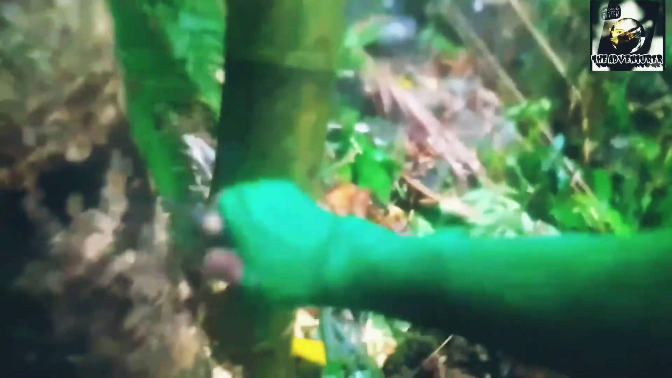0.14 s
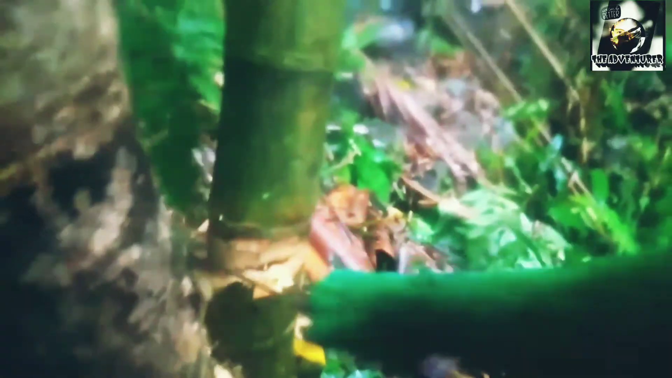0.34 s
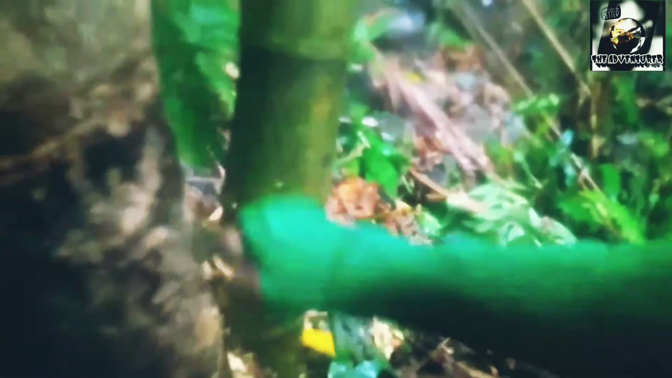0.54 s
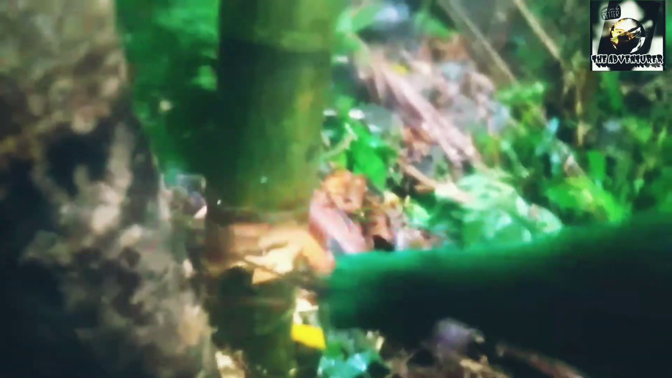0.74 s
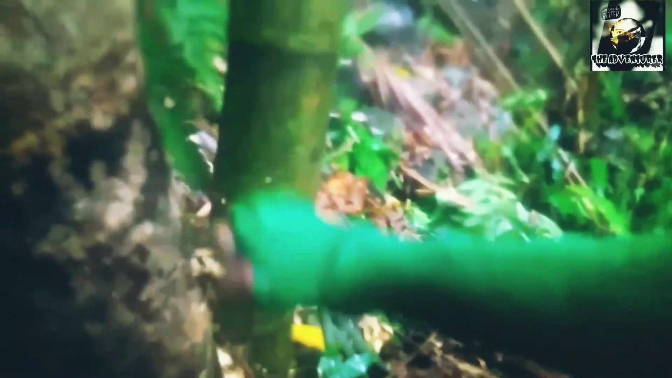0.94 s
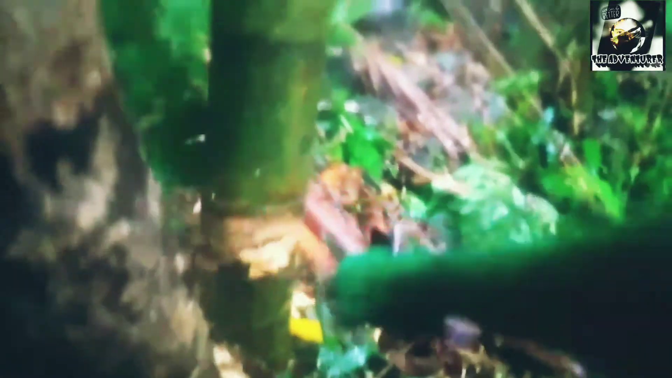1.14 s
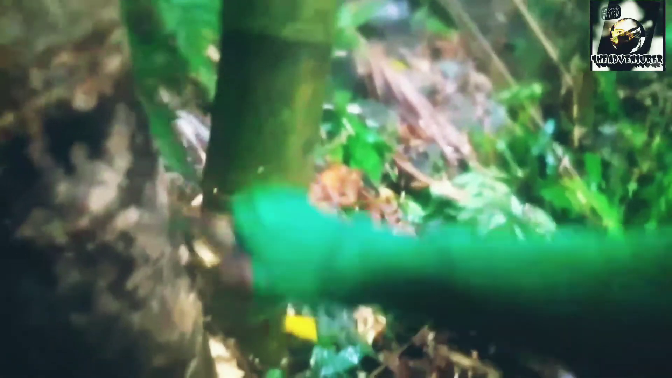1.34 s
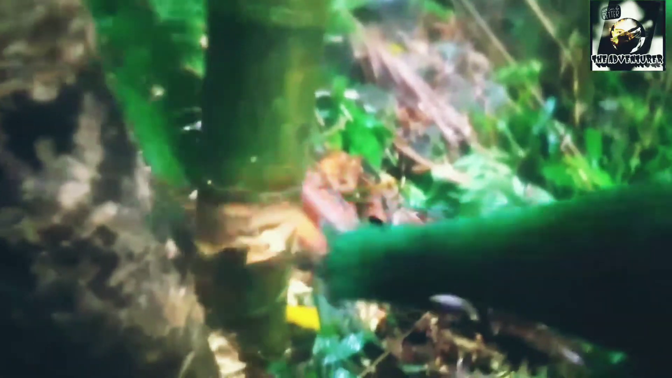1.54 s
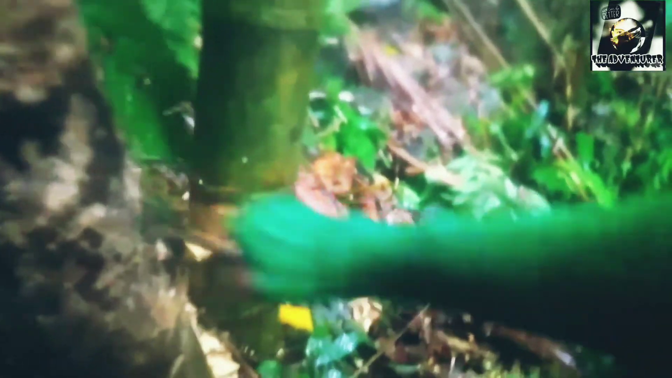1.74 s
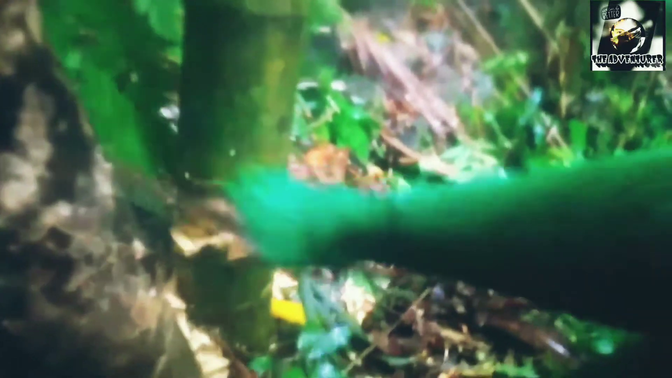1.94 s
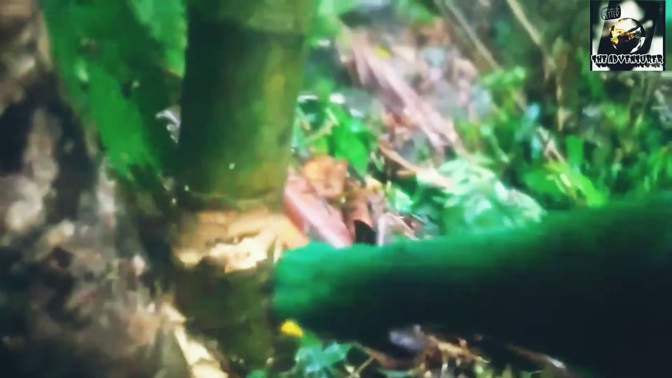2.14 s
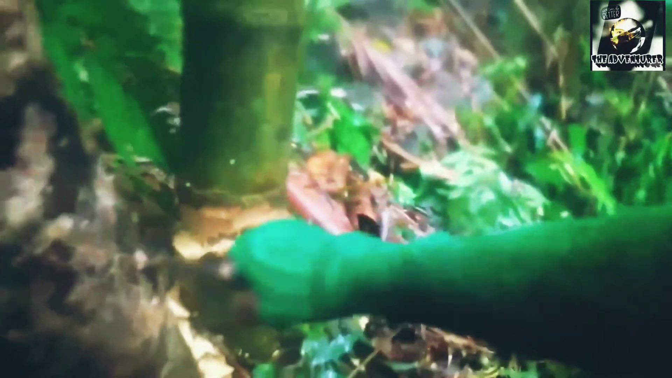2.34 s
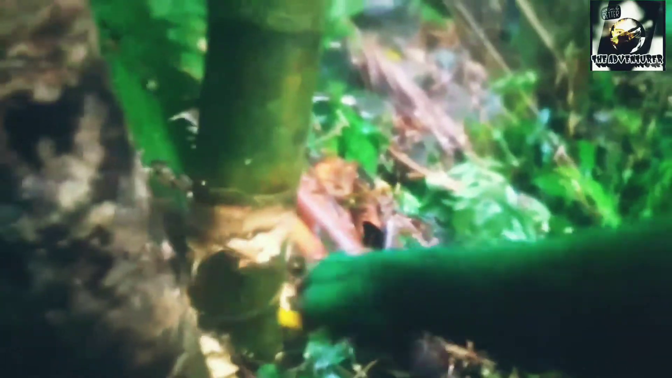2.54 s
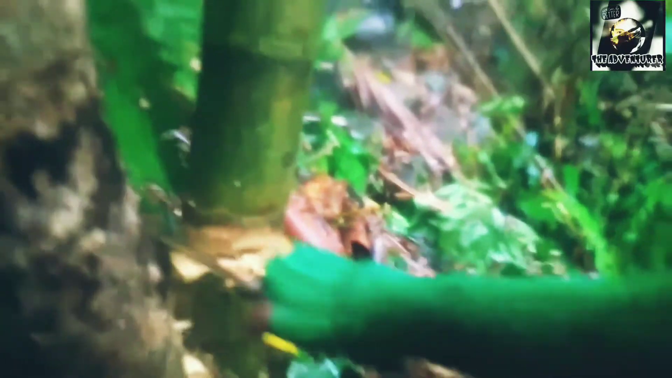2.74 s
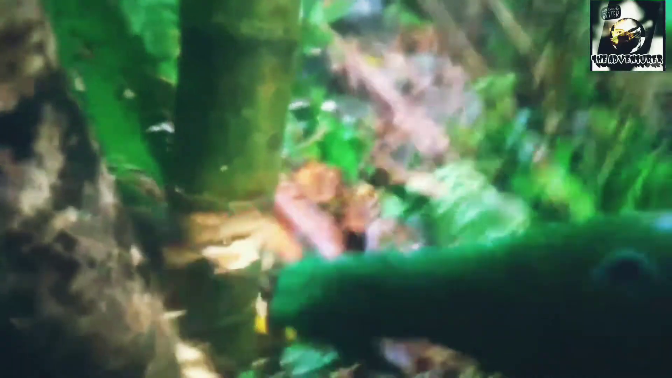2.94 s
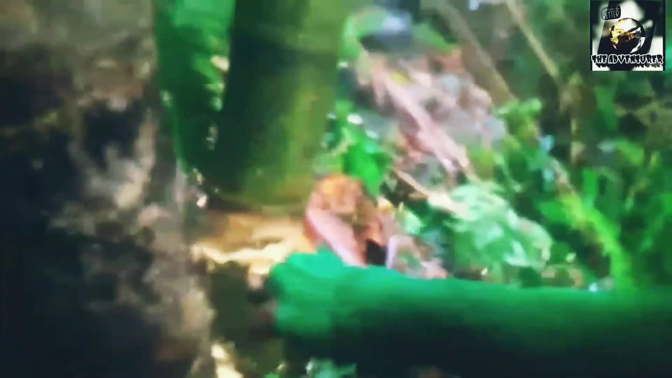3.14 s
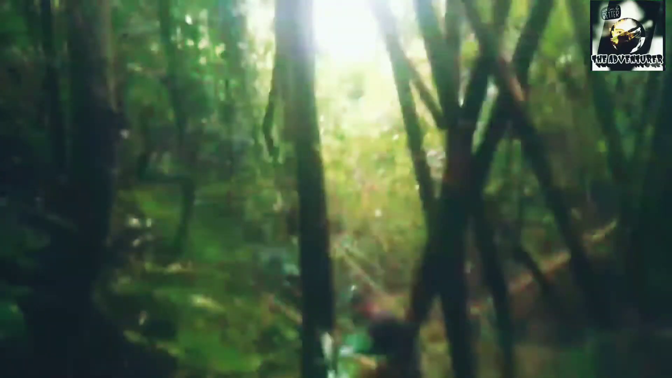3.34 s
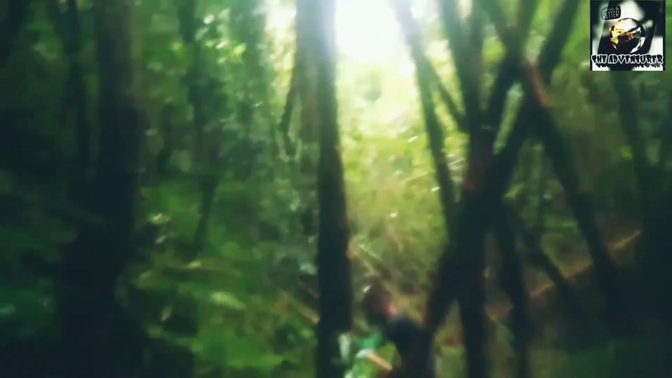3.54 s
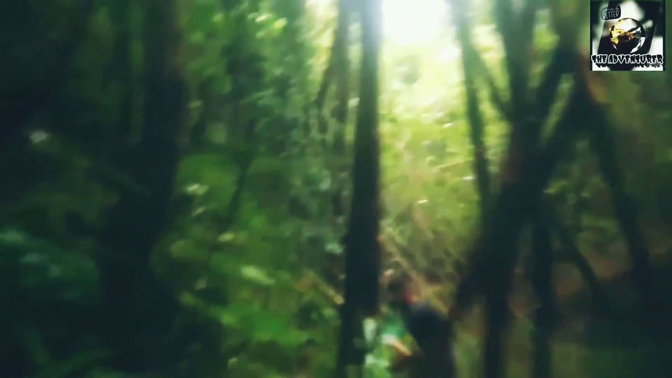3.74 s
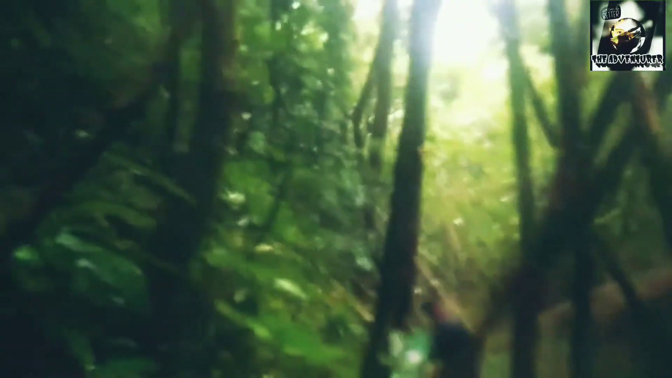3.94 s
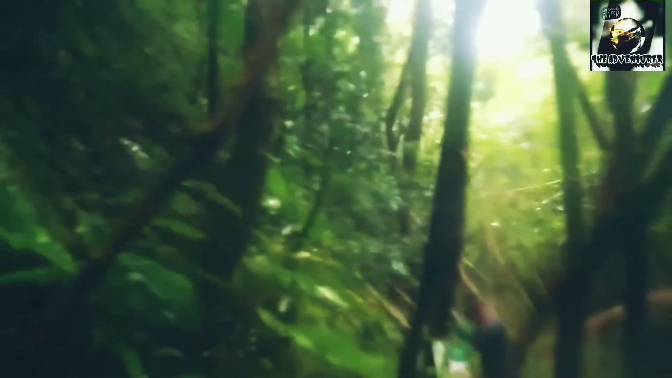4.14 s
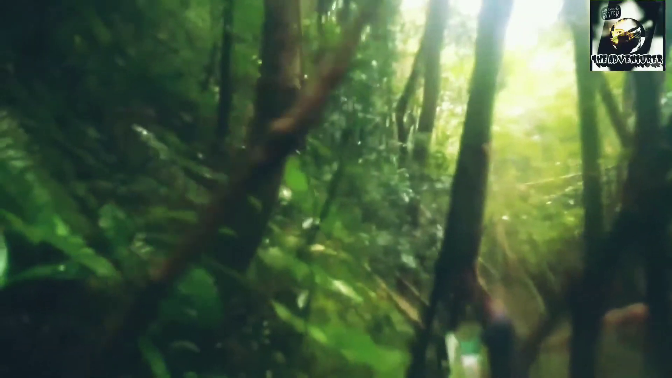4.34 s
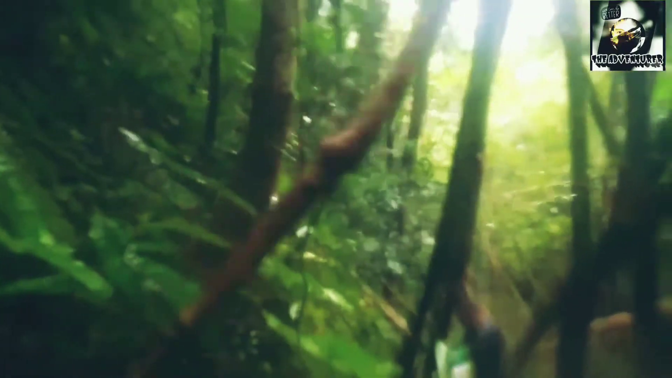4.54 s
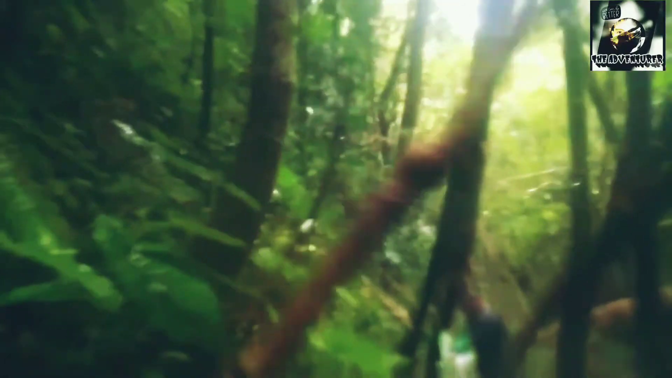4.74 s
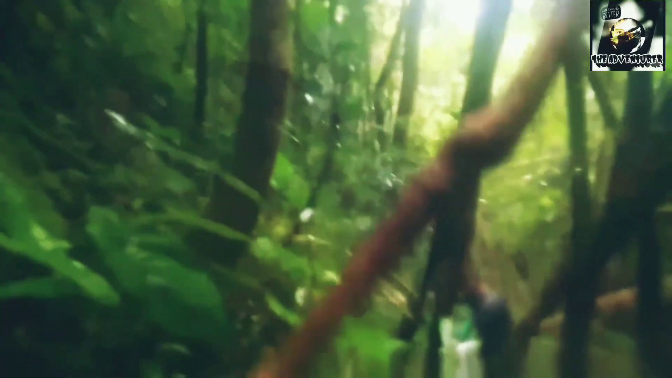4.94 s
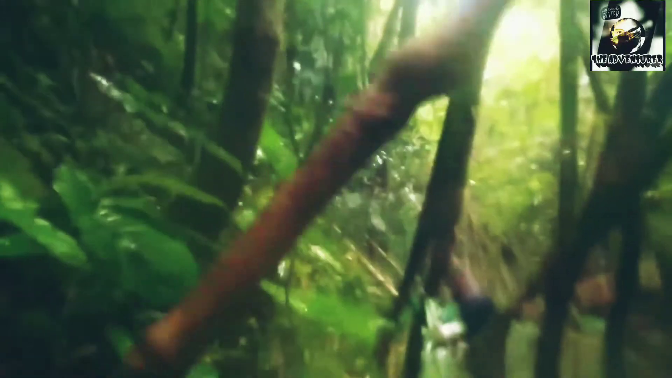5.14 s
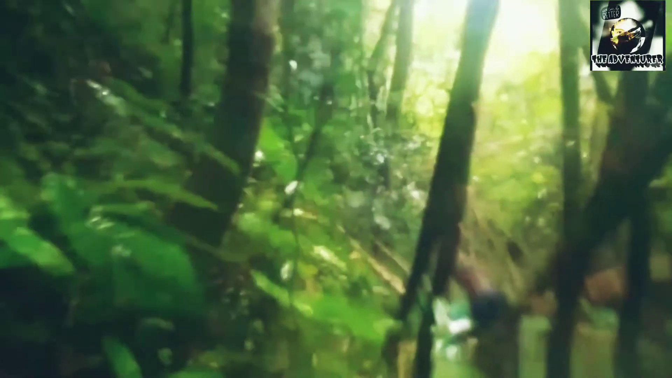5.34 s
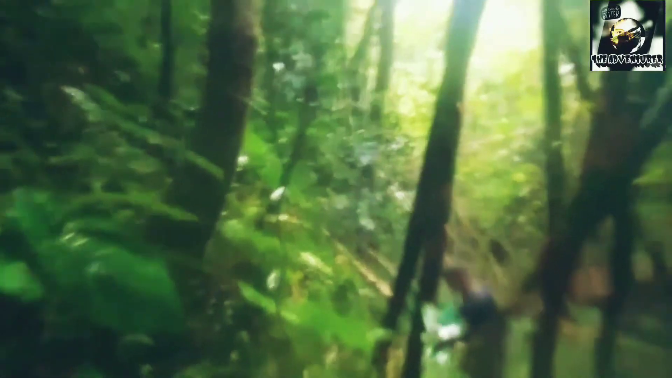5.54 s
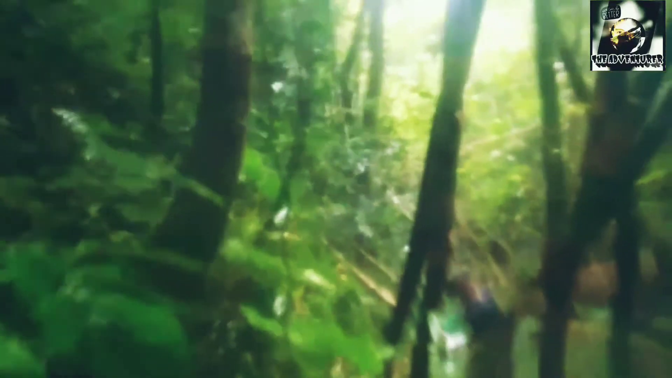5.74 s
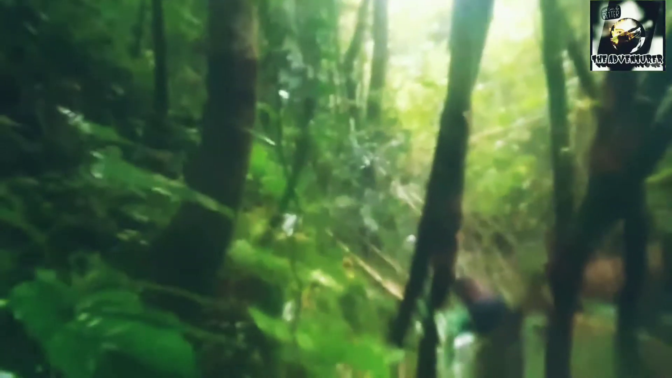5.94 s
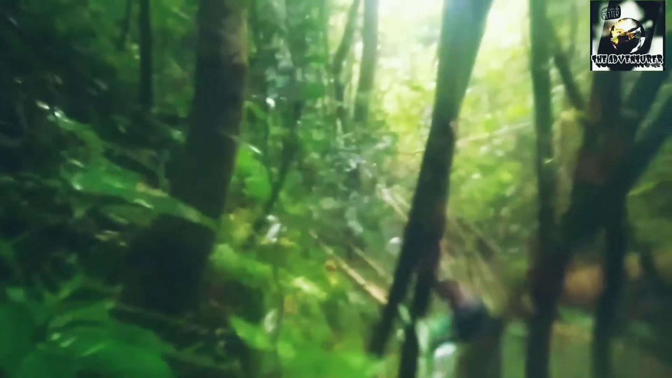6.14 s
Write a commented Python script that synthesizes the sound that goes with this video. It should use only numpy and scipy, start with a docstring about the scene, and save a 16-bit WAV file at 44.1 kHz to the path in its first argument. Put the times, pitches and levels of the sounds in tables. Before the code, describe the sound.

Close by, a blade bites thick green bamboo about every 0.4 seconds, each stroke a short air rush, splintering crunch and hollow tok. Lighter woody knocks fall between as it is worked free. Faint rain surrounds it. After about three seconds the scene jumps to louder rain among trees, with isolated dry cracks, leaf drips and bumps on the handheld phone.

```python
"""Chopping bamboo in the rain

Bamboo is chopped at arm's length in a rainy forest. Each swing is a rush of shaped noise, each bite a
string of tiny snaps, and the hollow stem rings as a set of fading tones. Lighter knocks follow as the
blade is worked free, and twice it grazes faintly before a bite. Then the scene cuts to louder rain among
the trees, made of filtered noise and drops, whose level creeps up at first, with single dry cracks.
Dull bumps on the phone are damped tones with clicks."""
import sys
import numpy as np
from scipy import signal
from scipy.fft import rfft, irfft
from scipy.io import wavfile
from scipy.ndimage import uniform_filter1d

SR = 44100
rng = np.random.default_rng(int(sys.argv[2]) if len(sys.argv) > 2 else 0)


def pcm_store(signal):
    """Save signal as 16-bit PCM."""
    levels = np.round(np.clip(np.atleast_2d(signal), -1, 1) * 32767)
    wavfile.write(sys.argv[1], SR, levels.astype(np.int16).T)


N = 272536
TIME = np.arange(N) / SR
T = np.arange(SR // 3) / SR  # time since a blow, in seconds

# Levels in the tables are relative: each source adds its own offset.
# strokes of the blade: t/s, bite/dB, wall/dB, hollow ring/dB, splitting time/s,
# swing before the bite/s, follow-through/s, blade speed/dB, moved air/dB
CHOPS = [(0.3519, -13.5, -38, -24.5, .006, 0.055, 0.0065, -0.5, -9),
         (0.7689, -13.5, -47, -27, .006, 0.051, .03, 0, -12),
         (1.183, -15, -18.5, -20, .011, 0.052, .045, 0.5, -7),
         (1.605, -19, -21, -29.5, .0074, .089, 0.059, -1, -3),
         (2.0873, -18, -23.5, -21, .0045, .094, 0.059, -1.5, -3),
         (2.5082, -16, -27.5, -21, .0064, 0.0033, 0.078, -7, -7.5),
         (3.019, -16, -18, -29, .0065, .058, 0.047, 5, -0.5)]
# the blade is worked free: t/s, level/dB, pitch ratio, contact brightness f/Hz
KNOCKS = [(.158, -25.5, 0.93, 3450), (.587, -26.5, 0.97, 3950), (.994, -25, .98, 3370),
          (1.409, -25, 0.99, 3780), (1.772, -37, 0.91, 1060), (1.8306, -13.5, .97, 3200),
          (2.388, -24, 0.997, 1850), (2.896, -31.5, 0.96, 1300), (3.284, -42, 0.99, 4400)]
# dry cracks, and two faint grazes of the blade just before a bite (the first two rows):
# t/s, level/dB, strongest resonance f/Hz
CRACKS_AND_GRAZES = [(.331, -36.5, 1720), (1.165, -40.5, 2400), (3.879, -13.5, 1716), (4.575, -15.5, 2270),
                     (4.808, -34, 1710), (5.294, -13, 1706), (5.77, -41.5, 1190), (5.8133, -34, 1710),
                     (5.982, -20.5, 1710), (6.129, -37.5, 1410)]
# bumps on the phone: t/s, thud/dB, thud f/Hz, ring of the case/dB, click/dB
BUMPS = [(.282, -43, 196, -37, -42), (0.565, -16, 127, -36, -37), (1.52, -39, 177, -34, -44.5),
         (2.079, -16.5, 209, -21, -27), (3.0666, -29, 177, -18.5, -13.5), (4.758, -37, 171, -60, -60),
         (4.9159, -12, 295, -8, 3.5), (4.999, -22, 205, -38, -52), (5.159, -27, 178, -50, -45),
         (5.8152, -19.5, 172, -15.5, -38)]
# fat drops close by: t/s, level/dB, spray/dB
DROPS = [(.921, -45.5, -58), (2.265, -49.5, -54), (3.144, -60, -41.5), (4.197, -36.5, -53.5),
         (4.518, -37, -39), (5.192, -36, -54), (5.9, -36.5, -57)]
# ringing tones (modes) of the stem wall: f/Hz, level/dB, time to fade by 60 dB/s
WALL_MODES = [(165, -23, 0.32), (352, -12, 0.23), (399, -7, 0.12), (535.4, -6, 0.093), (658, 4, 0.072),
              (743, 6.5, 0.041), (970, 1, 0.054), (1706, 0.5, 0.054), (2164, -3.5, 0.067),
              (2270, -12, 0.034), (2920, -37, 0.047)]
# modes of the knock: f/Hz, level/dB, time to fade by 60 dB/s; before pitch, brightness and damping
KNOCK_MODES = [(182, -15, 0.065), (424, -26.5, 0.25), (573, -12.5, 0.08), (808, -2.5, 0.08),
               (915, -5, 0.078), (1110, -5.5, 0.025), (1302, -8, 0.065), (1702, 2.5, 0.057),
               (1804, 1.5, 0.024), (696, -27, 0.12), (2310, -7.5, 0.057), (4400, -38, 0.13),
               (2396, -6.5, 0.05), (3240, -12.5, 0.057), (3900, -27, 0.097), (3870, -36, 0.22)]
# modes of a snapping cane: f/Hz, level/dB, time to fade by 60 dB/s
CANE_MODES = [(390, -34, 0.25), (745, -46, 0.012), (986, -11, 0.039), (1475, -2, 0.028), (2074, -11, 0.031),
              (2675, -10.5, 0.049), (3420, -21.5, 0.054)]
# modes of the phone's case: multiple of the thud pitch, level/dB, cycles to fade by 60 dB
CASE_MODES = [(2.6, -4, 5.1), (4.3, 1.5, 10)]
# colour of fibres splitting: f/Hz, level/dB
BITE_COLOUR = [(100, -1), (350, -45), (700, 0), (1500, -4.5), (2400, 1.5), (3100, -9), (4200, -17.5),
               (6000, -92), (15000, -77)]
# colour of flying splinters: f/Hz, level/dB
SPLINTER_COLOUR = [(2000, -56), (4000, 7), (5500, 0), (7800, 4), (9800, -7), (11200, -11.5), (15200, -4.5)]
# colour of scraping and tearing: f/Hz, level/dB
SCRAPE_COLOUR = [(300, -8.5), (700, 12), (1300, 2.5), (2400, 7.5), (3200, -3.5), (4300, -5), (5500, -57),
                 (15000, -72)]
# colour of cracks and grazes: f/Hz, level/dB
CRACK_COLOUR = [(59, 3), (100, -11), (265, -15.5), (533, -7.5), (1010, 0.5), (1240, -10), (1750, -2),
                (2720, -3), (3660, -24), (3990, -19), (5360, -27), (7690, -22), (10600, -41.5),
                (15800, -32)]
# colour of a hard contact on the phone: f/Hz, level/dB
CLICK_COLOUR = [(80, -52), (180, 1.5), (350, 13), (800, 6.5), (1600, 6), (2600, 1.5), (3900, -3),
                (5000, -24.5), (8000, -11.5), (12000, -32), (15500, -12.5)]
# colour of the grove's answer: f/Hz, level/dB
TAIL_COLOUR = [(71, -76), (120, -10), (361, -3), (602, -4), (1160, -3), (1340, -11), (1670, -11.5),
               (4360, -45), (8050, -29.5), (8740, -41), (15800, -38)]
# colour of arm and blade rushing through air: f/Hz, level/dB
RUSH_COLOUR = [(120, -20), (200, -14.5), (268, 0), (547, 0), (760, -9), (896, 1.5), (1970, 1.5),
               (2360, 0.5), (5090, -17.5), (7890, -8.5), (12200, -23), (15000, -10), (15800, -18)]
# colour of the flapping sleeve: f/Hz, level/dB
SLEEVE_COLOUR = [(40, 0), (90, -10.5), (160, 5), (270, -20.5), (400, -4.5), (650, -9.5), (1000, -33),
                 (3000, -52)]
# colour of water spray and rain hiss: f/Hz, level/dB
SPRAY_COLOUR = [(3000, -19), (6500, -4.5), (8000, -23), (10000, 5.5), (12500, -17), (15200, 11.5)]
# colour of the light rain: f/Hz, level/dB
LIGHT_RAIN_COLOUR = [(15, -1), (25, -3), (165, -14), (255, -23), (361, -16), (461, -20.5), (1150, -18.5),
                     (1780, -22.5), (2200, -23), (3300, -30), (3580, -30.5), (5370, -41), (7630, -33),
                     (8730, -40), (15800, -48)]
# colour of the heavy rain: f/Hz, level/dB
HEAVY_RAIN_COLOUR = [(22, 14.5), (50, -2.5), (100, -3), (260, -7), (500, -1), (1000, 2.5), (2600, 0),
                     (3500, -12.5), (5200, -20), (7800, -13.5), (9200, -23.5), (12500, -35), (14200, -26),
                     (15400, -21.5)]

HOLLOW_HZ = 1138.5  # note of the hollow between two nodes, before slight detuning
TYPICAL_SPLIT_S = 0.0061
TEARING_GRAIN_DB, TAIL_GRAIN_DB, RUSH_GRAIN_DB = 3.2, 2.5, 2.3  # unevenness of the tiny clicks
RUSH_DB = -45
SLEEVE_DB, SLEEVE_DB_PER_DB = -27, 4  # the flapping grows much faster than the moved air
# the arm is drawn back once
BACKSWING_START_S, BACKSWING_END_S = 1.875, 1.945
BACKSWING_SPEED_DB, BACKSWING_AIR_DB = -10, -3.5
CANE_SCATTER = .03  # typical detuning, as a share of the pitch
SNAP_S, ECHO_S, ECHO_DB = .004, 0.046, -22  # length of a snap; one trunk throws it back
THUD_CYCLES = 6.6  # cycles until a thud has faded by 60 dB
LIGHT_RAIN_DB, HEAVY_RAIN_DB = -56, -43.5
CUT_S = 3.372  # the scene cuts to louder rain
# a fixed ramp stands for the phone's gain recovering after the cut
RECOVERY_DB, RECOVERY_S = 4, 0.5
LIMIT_DB, RECOVER_DB_PER_S = -15, 9.5  # the phone's gain control
TOP_HZ = 15650


def chops(contact_s=.0005, bite_db=-4, wall_db=-3, hollow_db=9, splinter_db=-35, splinter_law=0.74,
          hollow_t60=0.071, build_s=0.004, tail_db=-31, tail_t60=0.24, crumble_db=-17):
    """The blade splits fibres, the wall clacks, the hollow between two nodes sings, the grove answers."""
    out = np.zeros(N)
    # the air inside takes a few milliseconds to start ringing
    swell = 1 - np.exp(-T / build_s)
    hollow_modes = [(HOLLOW_HZ, hollow_db, hollow_t60), (HOLLOW_HZ * .9, -2, .05),
                    (HOLLOW_HZ * 1.07, -2, .07), (HOLLOW_HZ * 1.03, -20, .3)]
    for s, db, wall_level, hollow_level, seconds, *_, speed_db, _ in CHOPS:
        bite = undb(db + bite_db) * tear(seconds, BITE_COLOUR)
        # a faster blade throws louder splinters
        chips = tear(seconds, SPLINTER_COLOUR) + undb(2.5) * burst(fade(0.04), SPLINTER_COLOUR)
        chips = undb(splinter_db + splinter_law * speed_db) * chips
        # wedged fibres keep tearing as the blade comes to rest, louder after a long split
        crumble = burst(fade(0.12), SCRAPE_COLOUR, grain_db=TEARING_GRAIN_DB)
        crumble = undb(db + crumble_db) * seconds / TYPICAL_SPLIT_S * crumble
        hollow = undb(hollow_level) * swell * ring(hollow_modes, scatter=0.024)
        grove = undb(tail_db) * burst(fade(tail_t60), TAIL_COLOUR, grain_db=TAIL_GRAIN_DB)
        wall = undb(wall_level + wall_db) * ring(WALL_MODES)
        # the edge first crushes the skin for a moment
        add(out, s - .003, undb(db - 22.0) * burst(fade(0.033), BITE_COLOUR))
        add(out, s + contact_s, bite + chips + crumble + hollow + grove + wall)
    return out


def tear(seconds, points, per_s=1300):
    """Bundles of fibres snap one after another, on average ever more weakly, as the blade travels."""
    count = int(np.clip(seconds * per_s, 3, 24))
    gap, size, side = rng.random((24, 3))[:count].T
    at = np.cumsum(.5 + gap)
    position = (at - at[0]) / at[-1] * seconds * SR
    snaps = np.zeros(len(T))
    snaps[position.astype(int)] = (.5 + size) * np.linspace(1, .5, count) * np.sign(side - .5)
    sound = colour(snaps, points)
    return sound * np.sqrt(seconds * SR) / np.linalg.norm(sound)


def swings(fullness=0.5):
    """Arm and blade rush by around every bite as a swell of air noise, and the sleeve flaps."""
    out = np.zeros(N)
    strokes = [(s - before, s + after, speed_db, air_db)
               for s, *_, before, after, speed_db, air_db in CHOPS]
    strokes.append((BACKSWING_START_S, BACKSWING_END_S, BACKSWING_SPEED_DB, BACKSWING_AIR_DB))
    for start, end, speed_db, air_db in strokes:
        length = max(int((end - start) * SR), 20)
        speed = np.sin(np.linspace(0, np.pi, length, endpoint=False)) ** fullness
        sleeve = undb(SLEEVE_DB + SLEEVE_DB_PER_DB * air_db) * burst(speed, SLEEVE_COLOUR)
        rush = undb(RUSH_DB + speed_db) * burst(speed, RUSH_COLOUR, grain_db=RUSH_GRAIN_DB)
        add(out, start, rush + sleeve)
    return out


def air_push(push_db=-24, hz=21, t60=0.47, delay_s=0.0397, build_s=0.0046):
    """After each bite the moved air rocks the microphone: a very low, fading wobble."""
    out = np.zeros(N)
    push = -np.sin(2 * np.pi * hz * T) * fade(t60) * (1 - np.exp(-T / build_s))
    for s, *_, air_db in CHOPS:
        add(out, s + delay_s, undb(push_db + air_db) * push)
    return out


def knocks(contact_s=.0005, ring_db=0, edge_db=-6, chip_db=-19, tail_db=-24, sharp_hz=3700,
           edge_law=3.6, damping_law=0.52):
    """Lighter, pitched knocks: a soft contact weakens high modes, rings shorter and scrapes less."""
    out = np.zeros(N)
    for s, db, pitch, bright_hz in KNOCKS:
        sharpness = bright_hz / sharp_hz
        length = sharpness ** damping_law
        modes = [(hz, size - 10 * np.log10(1 + (hz / bright_hz) ** 4), t60 * length)
                 for hz, size, t60 in KNOCK_MODES]
        body = undb(ring_db) * ring(modes, pitch, scatter=0.0048)
        scraping = burst(fade(0.063), SCRAPE_COLOUR, grain_db=TEARING_GRAIN_DB)
        scrape = tear(0.0039, SCRAPE_COLOUR) + undb(2.0) * scraping
        chips = undb(chip_db) * burst(fade(0.069), SPLINTER_COLOUR)
        edge = undb(edge_db) * sharpness ** edge_law * (scrape + chips)
        grove = undb(tail_db) * burst(fade(0.28), TAIL_COLOUR)
        add(out, s + contact_s, undb(db) * (body + edge + grove))
    return out


def cracks_and_grazes(contact_s=0.001242, crack_db=-1, ring_db=4.5, tail_db=-22, creak_db=-23,
                      creak_lead_s=0.0042):
    """Dry bamboo gives a little, snaps and echoes; two faint blade grazes are made the same way."""
    out = np.zeros(N)
    for s, db, hz in CRACKS_AND_GRAZES:
        snap = undb(crack_db) * tear(SNAP_S, CRACK_COLOUR)
        snap = snap + undb(-12.5) * burst(fade(0.23), CRACK_COLOUR, grain_db=TEARING_GRAIN_DB)
        body = undb(ring_db) * ring([(hz, 0, .028)] + CANE_MODES, scatter=CANE_SCATTER)
        trunks = undb(tail_db) * burst(fade(0.32), TAIL_COLOUR, grain_db=TAIL_GRAIN_DB)
        creak = undb(db + creak_db) * burst(fade(0.45), CRACK_COLOUR)
        add(out, s + contact_s - creak_lead_s, creak)
        add(out, s + contact_s, undb(db) * (snap + body + trunks))
        add(out, s + contact_s + ECHO_S, undb(db + ECHO_DB) * (snap + body))
    return out


def bumps(click_t60=0.014, rattle_db=-12):
    """Short, heavily damped thuds on the phone; a hard contact also clicks and rings the case."""
    out = np.zeros(N)
    click = colour(1. * (T == 0), CLICK_COLOUR)
    click = click / np.abs(click).max()
    for s, db, hz, case_db, click_db in BUMPS:
        thud = [(hz, db, THUD_CYCLES / hz)]
        case = [(multiple * hz, case_db + size, cycles / (multiple * hz))
                for multiple, size, cycles in CASE_MODES]
        contact = click + undb(rattle_db) * burst(fade(click_t60), CLICK_COLOUR)
        add(out, s, ring(thud + case) + undb(click_db) * contact)
    return out


def drops(pat_db=-1, spray_db=0):
    """Fat drops fall from the canopy, pat on a leaf and burst into spray."""
    out = np.zeros(N)
    for s, db, spray_level in DROPS:
        spray = undb(spray_level + spray_db) * burst(fade(0.025), SPRAY_COLOUR)
        add(out, s, undb(db + pat_db) * pat() + spray)
    return out


def pat(low_hz=500, high_hz=3000):
    """A drop lands on a leaf: a damped note at a random pitch plus a short scrape of noise."""
    hz = low_hz * (high_hz / low_hz) ** rng.random()
    return ring([(hz, -3, .025)]) + burst(fade(0.029), SCRAPE_COLOUR)


def rain(wide_db=-22, light_wide_db=-15):
    """Light rain by the stem, then a cut to louder rain; only its bright hiss spreads left and right."""
    among_trees = TIME > CUT_S
    # the level creeps up after the cut
    still_to_recover = np.clip(1 - (TIME - CUT_S) / RECOVERY_S, 0, 1)
    heavy = among_trees * undb(HEAVY_RAIN_DB - RECOVERY_DB * still_to_recover)
    light = ~among_trees * undb(LIGHT_RAIN_DB)
    mid = heavy * patter(HEAVY_RAIN_COLOUR) + light * patter(LIGHT_RAIN_COLOUR)
    mid = mid + (heavy * undb(3.5) + light * undb(6.5)) * drips()
    hiss = colour(rng.standard_normal(N), SPRAY_COLOUR)
    side = (heavy * undb(wide_db) + light * undb(light_wide_db)) * hiss
    return np.array([mid + side, mid - side])


def drips(count=12, size=22):
    """Drops of uneven strength keep landing on a handful of near leaves, each with its own sound."""
    out = np.zeros(N)
    for _ in range(count):
        sound = pat() + undb(-14) * burst(fade(.025), SPRAY_COLOUR)
        for when, weight in rng.random((size, 2)):
            add(out, when * N / SR, weight ** 2 * sound)
    return out


def patter(points):
    """Countless far drops on leaves merge into a hiss that flutters a little."""
    return unit(burst(undb(.5 * walk(8.8)), points, grain_db=2.0))


def leaves(x, scatter_db=-11, above_hz=5000, t60=0.004):
    """Foliage close by scatters the top of each sound to the left and right."""
    treble = signal.sosfilt(signal.butter(6, above_hz, "high", fs=SR, output="sos"), x)
    echoes = rng.standard_normal(len(T)) * fade(t60)
    side = undb(scatter_db) * signal.fftconvolve(treble, echoes / np.linalg.norm(echoes))[:N]
    return np.array([x + side, x - side])


def forest(x, wet_db=-25, t60=0.51, top_hz=3000):
    """Far trunks return a faint, dull wash after every blow."""
    echoes = rng.standard_normal(len(T)) * fade(t60) * (1 - np.exp(-T / 0.0025))
    echoes = echoes / np.linalg.norm(echoes)
    echoes = signal.sosfilt(signal.butter(2, top_hz, fs=SR, output="sos"), echoes)
    return x + undb(wet_db) * signal.fftconvolve(x, echoes)[:N]


def ring(modes, pitch=1, scatter=0.0126):
    """Sum of fading tones; every blow lands on another spot and detunes them a little."""
    sound = np.zeros(len(T))
    for k, (hz, db, t60) in enumerate(modes):
        tuned_hz = hz * pitch * (1 + scatter * rng.standard_normal())
        # every second mode starts in the opposite direction
        sound += (-1) ** k * undb(db) * fade(t60) * np.sin(2 * np.pi * tuned_hz * T)
    return sound


def burst(envelope, points, grain_db=2.5):
    """Many tiny clicks of uneven size under an envelope, coloured, with that envelope's energy."""
    grain = undb(grain_db * rng.exponential(size=len(envelope)))
    clicks = rng.standard_normal(len(envelope)) * grain
    sound = colour(clicks * envelope, points)
    return sound * np.linalg.norm(envelope) / np.linalg.norm(sound)


def colour(x, points, size=2048):
    """Filter through f/Hz, level/dB points without pre-echo, keeping the power of white noise."""
    hz, db = np.transpose(points)
    f = np.maximum(np.fft.rfftfreq(size, 1 / SR), 1)
    gain = undb(np.interp(np.log(f), np.log(hz), db))
    # folding the cepstrum (the spectrum of the log gain) makes the filter act only after its input
    cepstrum = irfft(np.log(gain))
    cepstrum[1:size // 2] *= 2
    cepstrum[size // 2 + 1:] = 0
    response = irfft(np.exp(rfft(cepstrum)))
    return signal.fftconvolve(x, response / np.linalg.norm(response))[:len(x)]


def fade(t60):
    """Smooth die-away after a blow, down 60 dB after t60 seconds."""
    return np.exp(-np.log(1000) * T / max(t60, 1 / SR))


def walk(rate):
    """Smooth random wander with spread near 1 and `rate` new targets a second."""
    knots = rng.standard_normal(N // 100)
    return np.interp(TIME * rate, np.arange(len(knots)), knots)


def undb(db):
    """Decibels to gain."""
    return 10 ** (np.asarray(db) / 20)


def unit(x):
    """Scale to an average (rms) strength of 1."""
    return x / np.sqrt(np.mean(x ** 2))


def add(track, s, sound):
    """Mix a sound in at time s, in seconds."""
    i = max(int(s * SR), 0)
    track[..., i:i + sound.shape[-1]] += sound[..., :N - i]


def gain_control(x, window_s=0.0023, ahead_s=0.0022):
    """The gain drops just ahead of any blow above the limit, then creeps back, taking the rain with it."""
    power = uniform_filter1d(np.mean(x ** 2, axis=0), max(int(window_s * SR), 1))
    over_db = 10 * np.log10(np.maximum(power / undb(LIMIT_DB) ** 2, 1))
    # the running maximum holds each cut while the rising line slowly releases it
    recovered_db = RECOVER_DB_PER_S * TIME
    cut_db = np.maximum.accumulate(over_db + recovered_db) - recovered_db
    return x * undb(-np.interp(TIME + ahead_s, TIME, cut_db))


def scene(low_cut_hz=110):
    """All the work happens straight ahead, inside the rain."""
    blows = forest(chops() + knocks() + cracks_and_grazes()) + bumps()
    # a low cut keeps the abrupt starts of the tones from adding bass
    blows = signal.sosfilt(signal.butter(3, low_cut_hz, "high", fs=SR, output="sos"), blows)
    return leaves(blows + swings() + drops()) + air_push() + rain()


def record(dry, ceiling=0.54):
    """The phone turns down the hardest blows, rounds their peaks and cuts the top."""
    rounded = ceiling * np.tanh(gain_control(dry) / ceiling)
    return signal.sosfilt(signal.ellip(10, .2, 70, TOP_HZ, fs=SR, output="sos"), rounded)


dry = scene()
out = record(dry)
pcm_store(out)
```